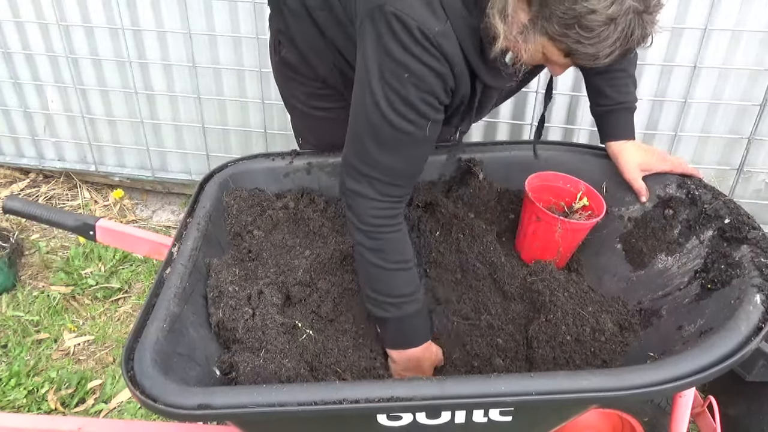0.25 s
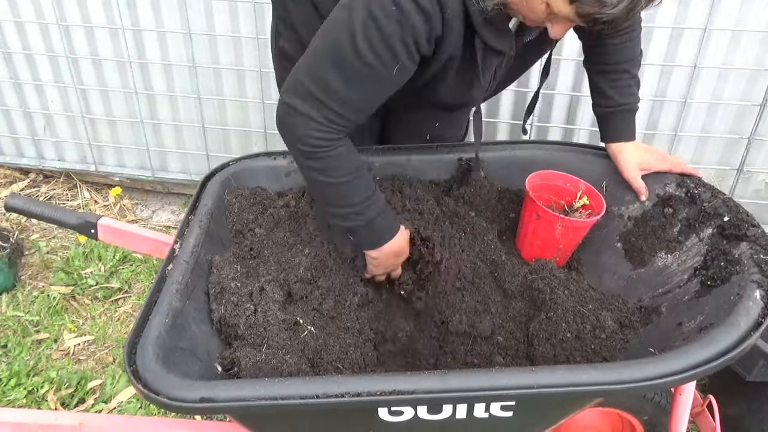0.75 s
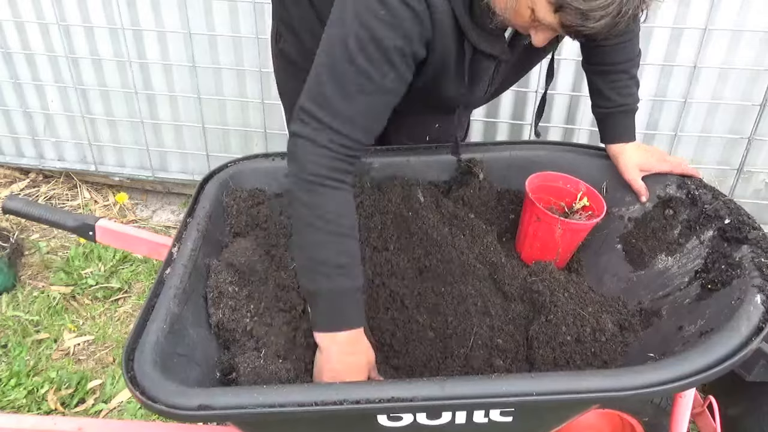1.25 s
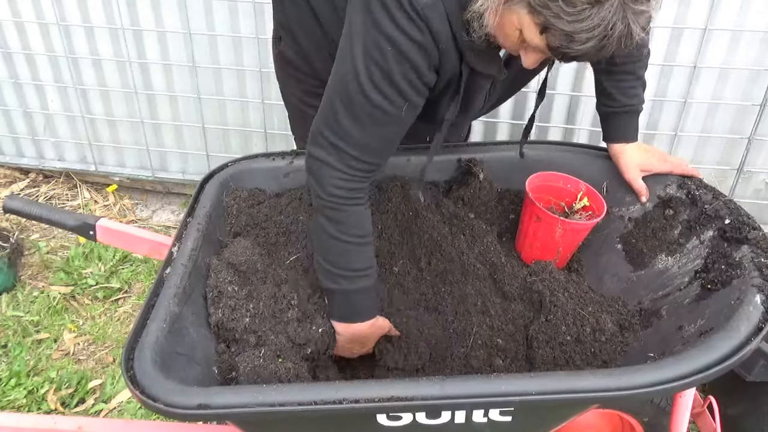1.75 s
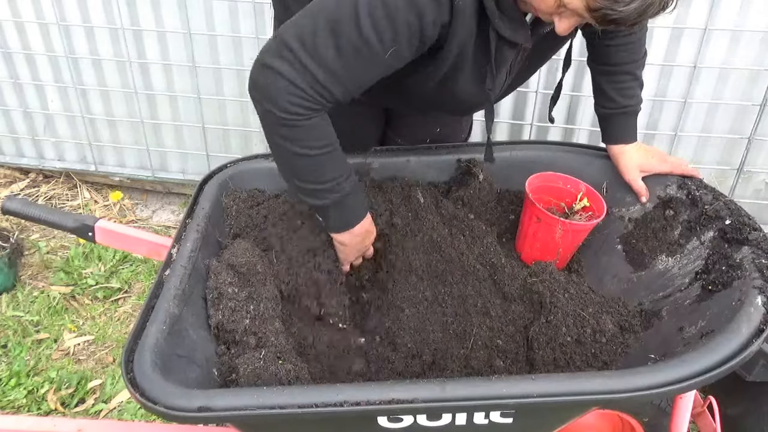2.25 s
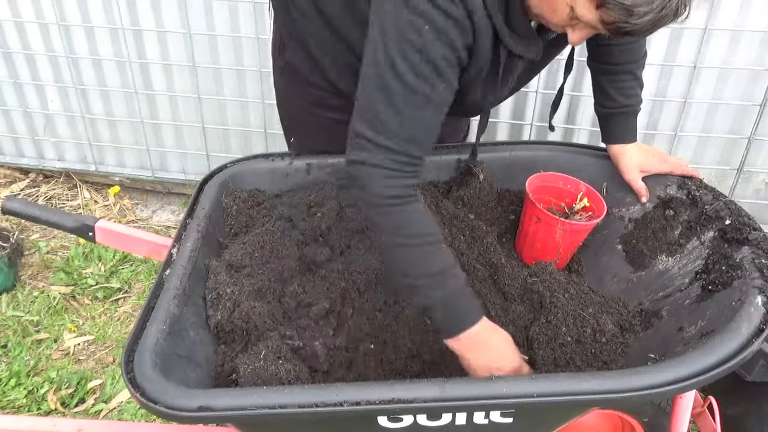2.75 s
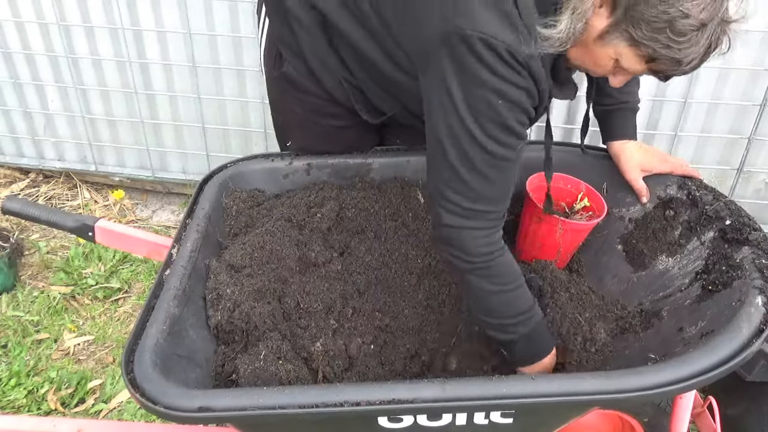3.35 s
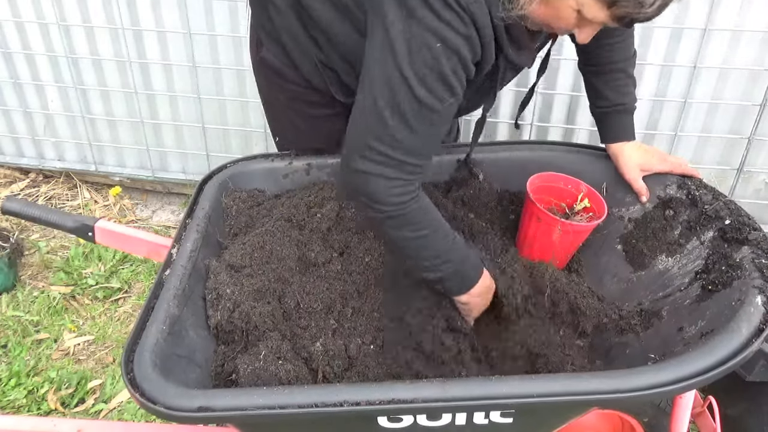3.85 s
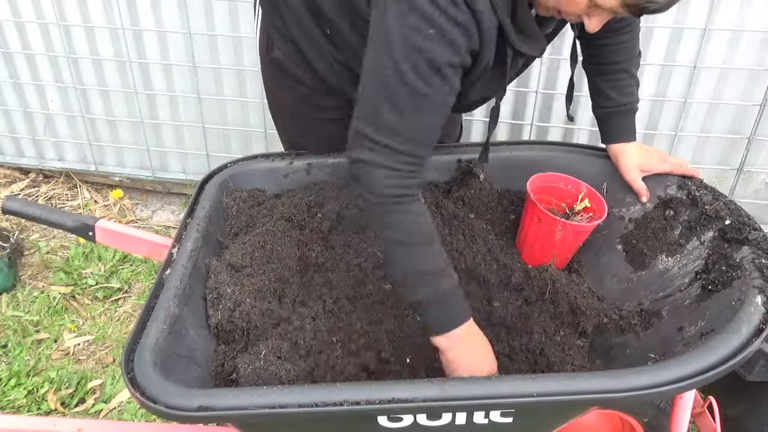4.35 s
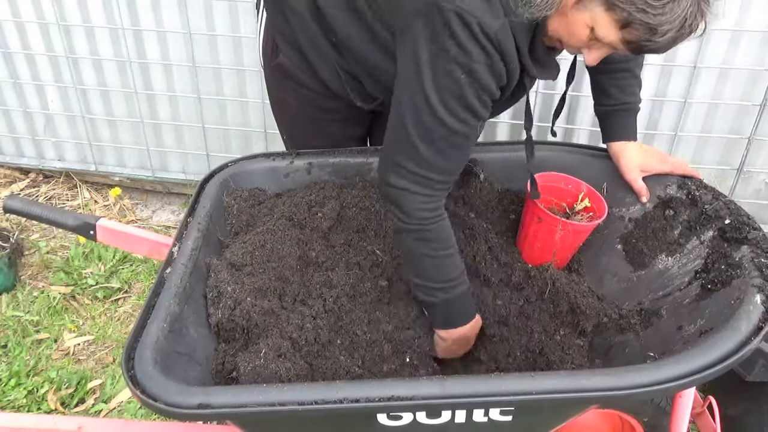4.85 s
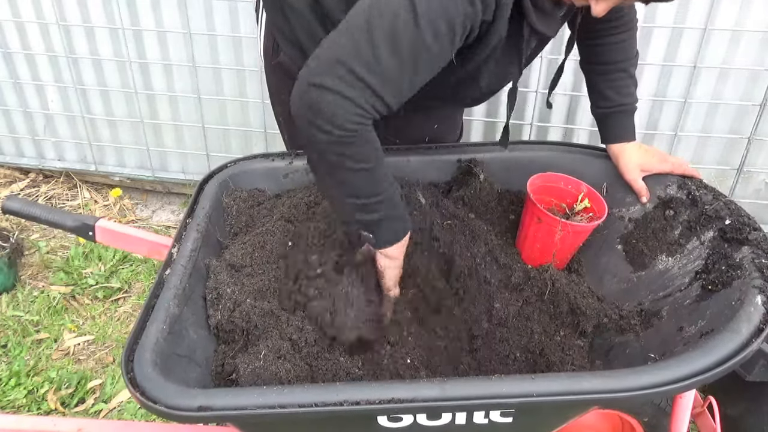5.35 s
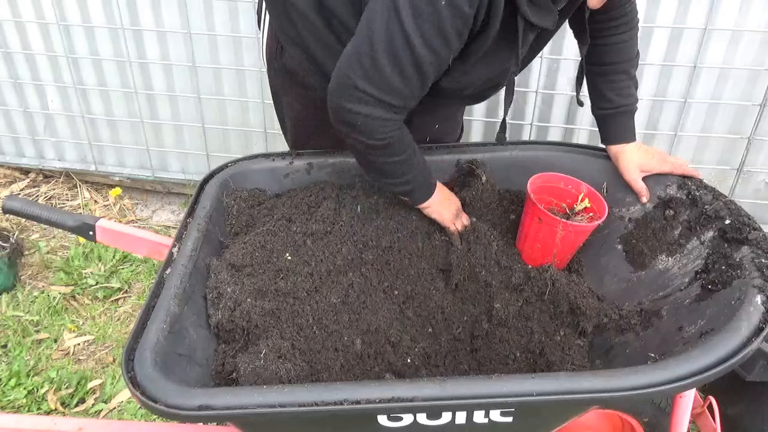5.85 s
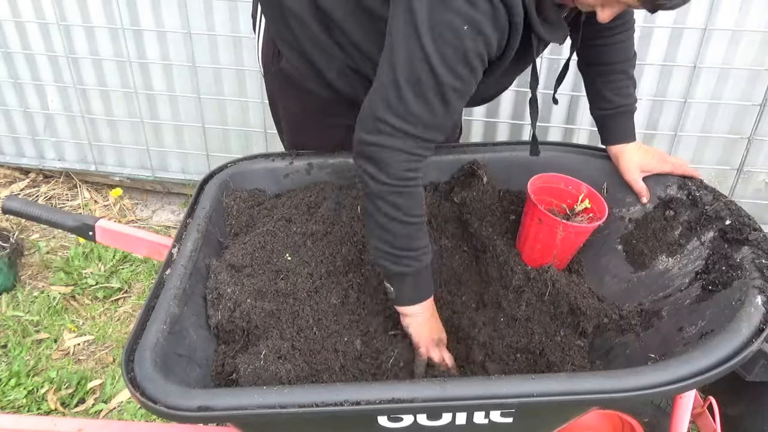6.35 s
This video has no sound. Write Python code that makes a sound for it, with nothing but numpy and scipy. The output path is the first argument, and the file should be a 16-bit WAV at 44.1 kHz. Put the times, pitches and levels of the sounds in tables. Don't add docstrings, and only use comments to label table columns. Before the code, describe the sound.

A bare hand digs through loose potting mix in a plastic tub, bark chips snapping sharply, while birds whistle in the garden behind.

```python
import sys
import numpy as np
from scipy import signal
from scipy.io import wavfile
from scipy.ndimage import map_coordinates

SR = 44100
rng = np.random.default_rng(int(sys.argv[2]) if len(sys.argv) > 2 else 0)


def ratio_of_db(decibels):
    return 10 ** (np.asarray(decibels, float) / 20)


def unload_audio(sound):
    columns = np.transpose(np.atleast_2d(sound))
    steps = np.round(np.clip(columns, -1, 1) * 32767)
    wavfile.write(sys.argv[1], SR, steps.astype(np.int16))


N = 291942

# (time [s], peak level [dB], thud over it
# [dB], crack over it [dB], chip pitch [Hz])
BREAKS = [(0.0425, -32, -10, -8, 1870), (0.078, -22, -8, -11.5, 2000), (0.0841, -25.5, -6, -15.5, 2880),
          (0.0954, -48, 3, -9, 1840), (1.0488, -24.5, -17, -27, 2650), (1.0557, -27.5, -13, -34, 2500),
          (1.3591, -24, -27, -11.5, 4600), (1.4308, -31, -11, -15, 2000), (1.6239, -33, -10.5, -19.5, 2200),
          (2.7685, -15, -23, -19, 2900), (2.7755, -29, -22, -14, 3300), (4.3645, -41, 1.5, -13, 2130),
          (4.3877, -55, 8, -2.5, 4330), (5.6168, -20.5, -16, -2, 2800), (5.6248, -39, -2, -4, 4580),
          (5.6324, -47, 0.5, -2.5, 1840), (5.6415, -37, -17, -2, 3470), (6.5416, -27, -16, -3, 2770),
          (6.5505, -41, -4, -3, 4500)]


def rms_one(x):
    return x / np.sqrt(np.mean(x ** 2) + 1e-20)


def in_time(rows):
    s, *columns = np.transpose(rows)
    return [np.interp(np.arange(N) / SR, s, column) for column in columns]


def at_hz(points, hz):
    points_hz, points_db = np.transpose(points)
    return np.interp(np.log(hz), np.log(points_hz), points_db)


def drift(rate_hz):
    r = np.exp(-2 * np.pi * rate_hz * 40 / SR)
    steps = rng.standard_normal(N // 40 + 2002)
    slow = signal.lfilter([1], [1, -2 * r, r * r], steps)[2000:]
    return np.interp(np.arange(N) / 40, np.arange(len(slow)), rms_one(slow))


def coloured(spectrum, patchy_db, flicker_hz, excite=1):
    # (frequency [Hz], side minus mid [dB])
    side_width = [(60, -15), (110, -13.5), (190, -12.5), (340, -10.5), (610, -12), (1090, -7.5),
                  (1960, -7.5), (3490, -8), (6240, -8), (11200, -28)]
    low_hz, high_hz = spectrum[0][0], spectrum[-1][0]
    edges = np.geomspace(low_hz, high_hz, int(2 * np.log2(high_hz / low_hz)) + 2)
    white = rng.standard_normal((2, 2, N)) * excite
    out, together = 0, drift(flicker_hz)
    for k, (low, high) in enumerate(zip(edges, edges[1:])):
        band = signal.butter(2, [low, high], "band", fs=SR, output="sos")
        mid, side = signal.sosfilt(band, white[k % 2])
        hz = np.sqrt(low * high)
        flicker_db = patchy_db * (0.63 * together + 1.33 * drift(flicker_hz))
        gain = ratio_of_db(at_hz(spectrum, hz) + flicker_db)
        out = out + gain * (mid + ratio_of_db(at_hz(side_width, hz)) * side * [[1], [-1]])
    return rms_one(out)


def swells(start_s, hold_s, level_db, rise_db_per_s, fall_db_per_s):
    t = np.arange(0, N + 32, 32) / SR
    start, end = start_s[:, None], (start_s + hold_s)[:, None]
    shape_db = -rise_db_per_s * np.maximum(start - t, 0) - fall_db_per_s * np.maximum(t - end, 0)
    power = np.sum(ratio_of_db(2 * (level_db[:, None] + shape_db)), axis=0)
    return np.interp(np.arange(N) / SR, t, power)


def garden_hiss():
    # (frequency [Hz], level per Hz [dB])
    air_spectrum = [(15, -43), (25, -1), (129, -17), (529, 6), (1030, 2), (1480, -14), (2060, -5.5),
                    (2880, 0.5), (4570, -9), (5610, -9), (6370, -4), (10600, -29), (11500, -31),
                    (15000, -55), (22000, -120)]
    return ratio_of_db(-60) * coloured(air_spectrum, patchy_db=1.7, flicker_hz=4.0)


def wind():
    # (start [s], hold [s], flutter level [dB], deep push over it [dB])
    gusts = [(0.0, .005, -53, -19), (0.09, .02, -49, -30), (0.2, 0.21, -61.5, -13), (0.55, .1, -70, 1.5),
             (0.7, .15, -65, 1.5), (0.81, .07, -66, 5), (0.89, 0.076, -61, 8.5), (0.985, .01, -53, -12),
             (1.46, .1, -66, -10), (1.6, .06, -64, -3), (1.79, .02, -66.5, -7), (3.077, .03, -58, -22),
             (4.42, 0.037, -65.5, -6), (5.17, .02, -52, -15), (5.22, .04, -54.5, -11), (5.3, .1, -56, -8),
             (5.44, .2, -56, -7), (5.67, .015, -58, -5), (5.75, .15, -63, -4), (5.95, .45, -68, -3),
             (3.45, .2, -67, -15), (1.1, .15, -74, 3), (6.552, .02, -54.5, -20)]
    # (frequency [Hz], level per Hz [dB])
    flutter_spectrum = [(88, -48), (150, 0), (303, -3.5), (345, -2.5), (520, -8.5), (680, -38),
                        (1140, -120)]
    push_spectrum = [(18, -54), (30, -16), (64, 3.5), (108, -0.5), (134, 2.5), (200, -4), (260, -25),
                     (440, -120)]
    breeze_db, breeze_push_db = -71, -79

    def gust_gain(level_db, calm_db):
        gust_power = swells(s, hold, level_db, rise_db_per_s=380, fall_db_per_s=260)
        return np.sqrt(ratio_of_db(2 * calm_db) + gust_power)

    s, hold, flutter_db, push_db = np.transpose(gusts)
    lumpy = gust_gain(flutter_db, breeze_db)
    deep = gust_gain(flutter_db + push_db, breeze_push_db)
    flutter = ratio_of_db(-2.0) * lumpy * coloured(flutter_spectrum, patchy_db=1.5, flicker_hz=13.5)
    mesh = signal.butter(4, 480.0, fs=SR, output="sos")
    flutter = signal.sosfilt(mesh, flutter)
    return flutter + ratio_of_db(-2.5) * deep * coloured(push_spectrum, patchy_db=0.0, flicker_hz=11.6)


def hand():
    # (time [s], effort [dB], depth in the heap [dB])
    stir = [(0.0, -56, -0.6), (0.2, -55.5, -0.6), (0.5, -58, -0.6), (1.4, -58.5, -1.2), (1.62, -58, 0.4),
            (1.82, -60.5, 0.6), (2.36, -62, -0.6), (2.95, -61, 0.6), (3.25, -57.5, 1.2), (4.06, -62.5, 1.2),
            (4.54, -61.5, 1.2), (4.8, -63.5, 2.2), (5.36, -64.5, 1.2), (5.73, -62, 0.6),
            (5.97, -64.5, -0.6), (6.47, -64, 1.5), (6.62, -62, 0.4)]
    # (start [s], hold [s], rubbing level [dB], grit over it [dB], lumps over it [dB])
    scoops = [(-0.02, .022, -47.5, 0.5, -3.5), (0.095, .04, -51, -3, 2.5), (0.69, .01, -59, -2.5, -2.5),
              (1.434, .016, -49, -2, -2), (1.462, .022, -44, -4, -3.5), (1.53, .105, -49.5, -1.5, -4),
              (1.80, .02, -57, -3.5, -6), (2.605, 0.043, -54, -3.5, -1), (2.985, .19, -52.5, 3.5, -2.5),
              (3.402, .03, -57, -8, -4.5), (4.322, 0.069, -57, -5, -4), (5.605, .065, -54, 0.4, -1),
              (5.804, .02, -60, 0.5, -6), (6.16, .03, -60.5, -4, -5), (6.525, .06, -56, 0.5, 0)]
    # (lumps [dB], rubbing [dB], grit [dB])
    shed_db = [-14.5, -23, -22]
    shed_after_s = 0.0055
    effort_db, depth_db = in_time(stir)
    stir_db = [effort_db + depth_db - 0.06, effort_db + depth_db / 2 + 2.5, effort_db + 0.15]
    s, hold, rub_db, grit_db, lump_db = np.transpose(scoops)
    at, chip_db, thud_db, crack_db, _ = np.transpose(BREAKS)
    layers = zip(stir_db, (lump_db, 0, grit_db), (thud_db, 0, crack_db), shed_db)
    gains = []
    for steady_db, scoop_db, part_db, crumbs_db in layers:
        scooped = swells(s, hold, rub_db + scoop_db, rise_db_per_s=400, fall_db_per_s=190)
        shed = swells(at + shed_after_s, 0, chip_db + part_db + crumbs_db, rise_db_per_s=3000, fall_db_per_s=650)
        gains.append(np.sqrt(ratio_of_db(2 * steady_db) + scooped + shed))
    return gains


def grains(per_s, spread_db, bed):
    born = rng.random(N) < per_s / SR
    sizes = ratio_of_db(spread_db * np.minimum(rng.exponential(1, N), 4.0))
    return bed + signal.lfilter([1], [1, -.96], born * sizes)


def soil():
    # (frequency [Hz], level per Hz [dB])
    crumble_spectrum = [(120, -46), (200, -14), (416, -4.5), (465, -1.5), (1500, -4), (1950, -37),
                        (3300, -120)]
    rub_spectrum = [(820, -40), (1400, -3), (1860, -2), (2620, -3.5), (4600, -6.5), (5980, -38),
                    (10100, -120)]
    grit_spectrum = [(2650, -28), (4500, 3), (10500, -4), (11300, -11), (11500, -29), (15000, -59),
                     (22000, -120)]
    lumps, fingers, fines = hand()
    bed = 5.4 * (np.median(fingers) / fingers) ** 0.4
    contacts = grains(per_s=220, spread_db=3.5, bed=bed) / (bed + 0.45)
    crumble = lumps * coloured(crumble_spectrum, patchy_db=1.0, flicker_hz=7.5, excite=contacts)
    rub = fingers * coloured(rub_spectrum, patchy_db=1.4, flicker_hz=21.5, excite=contacts)
    grit = fines * coloured(grit_spectrum, patchy_db=0.83, flicker_hz=41, excite=contacts)
    return crumble + rub + grit


def all_snaps():
    # (time [s], peak level [dB], crack over it [dB], chip pitch [Hz], left-right [dB])
    chips = [(0.6847, -35.5, -28, 1940, 3), (1.0332, -37, -23, 2390, 1.2), (1.1218, -46, -17, 2100, 0.4),
             (1.2245, -42, -11, 2430, 1.5), (1.277, -39, -25, 2100, 0.4), (1.2822, -37, -20.5, 2060, 0.4),
             (1.3144, -38, -4.5, 3680, 2.2), (1.3667, -43, -12, 2370, -2.2),
             (1.8256, -42.5, -16, 2300, -0.4), (2.6136, -34.5, -12, 3100, 5), (2.6404, -34.5, -12, 2230, 3),
             (4.3238, -42, -5, 4300, -0.4), (4.356, -47, -7, 1970, -1.5), (4.4364, -43, -9.5, 2060, -1.2),
             (5.6436, -41, 1, 4260, 5), (5.998, -47, -10, 4740, -0.4), (6.3973, -48, -7.5, 3060, 2.2),
             (6.4546, -40, -18, 3560, -4), (6.57, -38, -22, 3000, -1.2)]
    # (time [s], crack level [dB], left-right [dB])
    ticks = [
        (2.0144, -54, -9.5),
        (2.0994, -53, -3),
        (3.371, -52, 1.2),
        (4.3131, -39.5, 4),
        (4.35, -53, -12),
        (6.5002, -45, 6),
    ]
    # (time [s], peak level [dB], crack over it [dB], pitch [Hz])
    crumbs = [(1.4258, -35, -18, 2200), (1.434, -35, -16, 2200), (1.4405, -38, -20, 2000),
              (1.4485, -38, -20, 1700), (1.4556, -33, -22, 1200), (1.4612, -32, -22, 2200),
              (1.4665, -31, -20, 2400), (1.4708, -29, -20, 1700), (1.4775, -33, -18, 1300),
              (1.4848, -32, -20, 1300), (1.4895, -38, -14, 3500), (1.4958, -33, -22, 1300),
              (1.5045, -39, -20, 2500), (1.5175, -39, -18, 1700), (1.5905, -40, -16, 3500),
              (1.6045, -39, -18, 2800), (1.6305, -41, -12, 4500), (0.0865, -33, -8, 2200),
              (0.0895, -38, -12, 2600), (0.8726, -42, -20, 2090), (1.0285, -42, -24, 1500),
              (1.0408, -41, -18, 3800), (2.594, -42, -16, 1400), (2.661, -44, -20, 900),
              (2.7722, -30, -14, 2200), (2.9943, -42, -10, 4000), (3.1165, -44, -10, 4000),
              (5.6195, -33, -3, 3600), (5.6212, -35, -5, 2400), (5.6455, -45, 2, 4000),
              (6.5042, -46, -14, 3600), (6.5335, -44, -12, 3200), (6.5385, -43, -3, 2000),
              (6.5445, -38, 0, 4200), (6.575, -45, -16, 2800), (6.578, -45, -16, 2800),
              (6.5902, -41, -16, 3700)]
    # (time [s], peak level [dB], pitch [Hz])
    splits = [
        (2.7685, -15.5, 4500),
        (2.7684, -20, 6400),
        (2.7685, -19, 2000),
        (5.617, -25, 5300),
        (5.6168, -14, 9500),
        (6.5417, -26, 9300),
    ]
    break_pan_db, chip_thud_db = 1.3, -16.5
    rest_db = -32
    return ([(s, db, db + thud, db + crack, hz, break_pan_db) for s, db, thud, crack, hz in BREAKS]
            + [(s, db, db + chip_thud_db, db + crack, hz, pan) for s, db, crack, hz, pan in chips]
            + [(s, db - 7, db - 9.5, db, 1900, pan) for s, db, pan in ticks]
            + [(s, db, db + chip_thud_db, db + crack, hz, 0.4) for s, db, crack, hz in crumbs]
            + [(s, db, db + rest_db, db + rest_db, hz, break_pan_db) for s, db, hz in splits])


def resonate(x, modes):
    out = 0
    for k, (hz, width_hz, level_db) in enumerate(modes):
        r = np.exp(-np.pi * width_hz / SR)
        poles = [1, -2 * r * np.cos(2 * np.pi * hz / SR), r * r]
        zeros = [(1 - r * r) / 2, 0, (r * r - 1) / 2]
        out = out + (-1) ** k * ratio_of_db(level_db) * signal.lfilter(zeros, poles, x + 1e-18)
    return out


def thrown_back(snapped):
    t = np.arange(SR // 10) / SR
    decay = ratio_of_db(-60 * t / 0.033) * (t > .0008)
    mid, side = rng.standard_normal((2, len(t))) * decay
    scatter = np.array([mid + 0.55 * side, mid - 0.12 * side])
    scatter = signal.lfilter([.7], [1, -.3], scatter / np.sqrt(np.sum(mid ** 2)))
    return ratio_of_db(-10.5) * signal.fftconvolve(snapped, scatter, axes=1)[:, :N]


def snaps():
    # (pitch ratio, width ratio, level [dB])
    chip_modes = [(0.998, 0.79, 17.5), (1.75, 1.75, 8)]
    # (frequency [Hz], width [Hz], level [dB])
    tub_modes = [(696, 330, 1.5), (1242, 780, 0.5)]
    crack_modes = [(5700, 1770, -4), (7380, 2050, -1.5), (10000, 6500, -3.5)]
    events = all_snaps()
    t = np.arange(1500) / SR
    bursts = rng.standard_normal((len(events), 3, len(t)))
    lasting_s = np.array([[.012], [.025], [.007]])
    splintering = ratio_of_db(-60 * t / lasting_s) * np.minimum(t / 0.00051, 1)
    pulse = np.arange(len(t)) == 30
    snapped = np.zeros((2, N + len(t)))
    for (s, chip_db, thud_db, crack_db, chip_hz, pan_db), burst in zip(events, bursts):
        force = 0.1 * burst * splintering + pulse
        chip = [(chip_hz * ratio, chip_hz * width, db) for ratio, width, db in chip_modes]
        tilt_db = 0.22 * (crack_db - chip_db + 4.0)
        crack = [(hz, width, db + k * tilt_db / 2) for k, (hz, width, db) in enumerate(crack_modes)]
        bodies = [resonate(resonate(f, m), m) for f, m in zip(force, (chip, tub_modes, crack))]
        levels = ratio_of_db([chip_db + 0.23, thud_db + 2.5, crack_db + 11.5])
        snap = sum(level * body / np.abs(body).max() for level, body in zip(levels, bodies))
        i = round(s * SR)
        snapped[:, i:i + len(t)] += snap * ratio_of_db([[pan_db / 2], [-pan_db / 2]])
    snapped = snapped[:, :N]
    return snapped + thrown_back(snapped)


def bumps():
    # (time [s], frequency [Hz], level [dB])
    knocks = [
        (5.165, 200, -44),
        (5.17, 290, -46),
        (5.215, 290, -49),
        (5.39, 180, -48),
        (5.667, 165, -43),
        (0.088, 370, -42),
        (4.42, 150, -56),
        (6.55, 160, -47),
    ]
    out, t = np.zeros(N + SR), np.arange(SR // 5) / SR
    for s, hz, level_db in knocks:
        i = round(s * SR)
        swell = ratio_of_db(level_db - 60 * t / 0.11) * np.minimum(t / .008, 1)
        out[i:i + len(t)] += swell * np.sin(2 * np.pi * hz * t)
    return out[:N]


def glide(row, kind):
    start, length, first_hz, last_hz, level_db = row
    onset, arch, hook, top, before_db, after_db = kind
    settle_s = 0.01196
    u = np.linspace(0, 1, num=round(length * 500) + 2)
    bend = onset * np.exp(-u * length / settle_s)
    bend = bend + arch * (1 - np.abs(2 * u - 1) ** 2.8)
    bend = bend + hook * np.exp((u - 1) * length / settle_s)
    hz = (first_hz + (last_hz - first_hz) * u) * (1 + bend)
    swell_db = np.interp(u, [0, np.clip(top, .02, .98), 1], [before_db, 0, after_db])
    return np.transpose([start + u * length, hz, level_db + swell_db])


def note(rows, fade_s):
    s, hz, level_db = np.transpose(rows)
    t = np.arange(s[0], s[-1], 1 / SR)
    fade = np.clip(np.minimum(t - s[0], s[-1] - t) / fade_s, 0, 1)
    gain = ratio_of_db(np.interp(t, s, level_db)) * fade
    phase = 2 * np.pi * np.cumsum(np.interp(t, s, hz)) / SR
    i = round(s[0] * SR)
    return slice(i, i + len(t)), phase, gain


def swipes():
    # (start [s], length [s], first centre [Hz], last centre [Hz], level [dB])
    strokes = [(3.525, .08, 2800, 3900, -50.5), (3.535, .1, 4150, 4350, -49.5),
               (3.54, .07, 5000, 5000, -53.5), (6.098, .045, 2300, 3100, -60),
               (6.115, .085, 3000, 4100, -54.5), (6.165, .07, 3600, 3450, -59.5),
               (3.04, .065, 1420, 1300, -48.5), (3.09, .05, 1300, 1350, -48.5),
               (2.995, .05, 1300, 1300, -55), (1.435, .075, 1600, 1100, -47), (1.455, .03, 1900, 2300, -45)]
    out = np.zeros(N)
    for row in strokes:
        rows = glide(row, (0, .04, 0, 0.6, -10, -12))
        span, phase, gain = note(rows, fade_s=0.018)
        share = .28 * ratio_of_db(.7 * (row[-1] + 50))
        steps = rng.standard_normal((2, 600))
        a, b = [map_coordinates(v, [share * phase / (2 * np.pi)], order=3) for v in steps]
        out[span] += gain * (a * np.cos(phase) + b * np.sin(phase))
    return out


def birds(notes, flutter_db, echo_db, pan_db):
    whistle = np.zeros(N)
    for rows in notes:
        span, phase, gain = note(rows, fade_s=0.004)
        whistle[span] += np.sqrt(2) * gain * np.sin(phase)
    whistle = whistle * ratio_of_db(flutter_db * drift(38))
    t = np.arange(SR // 2) / SR
    decay = ratio_of_db(-60 * t / 1.0) * (t > .015)
    garden = rng.standard_normal((2, len(t))) * decay / np.sqrt(0.025 * SR)
    wet = signal.fftconvolve(whistle[None], garden, axes=1)[:, :N]
    far_wall = ratio_of_db(-15 + 3.0 * drift(15)) * np.roll(whistle, round(.16 * SR))
    direct = whistle + far_wall
    return direct * ratio_of_db([[pan_db / 2], [-pan_db / 2]]) + ratio_of_db(echo_db) * wet


def birdsong():
    # (onset bend [share], arch [share], end bend [share], loudest at [share],
    # level before [dB], level after [dB])
    plain = (0, 0, 0, 0.56, -4.5, -6)
    drop = (0.23, 0, 0, 0.1, -12, -11.5)
    lift = (-.1, 0, 0, .65, -12, -10)
    arched = (0, .15, 0, 0.4, -16, -17)
    hooked = (0, 0, -0.15, 0.5, -6.5, -7)
    far_arched = (0, .012, 0, .5, -2, -2)
    # (start
    # [s], length [s], first pitch [Hz], last pitch [Hz], level [dB])
    song_plain = [
        (2.432, 0.081, 2230, 2176, -46.5),
        (3.145, .05, 2075, 1995, -40.5),
        (3.27, .085, 1700, 1538, -51),
    ]
    song_drop = [(2.645, .26, 2010, 1795, -42)]
    song_lift = [(3.015, .125, 2340, 2087, -38)]
    song_arched = [(1.955, .32, 1630, 1660, -50)]
    song_hooked = [(2.575, .085, 3097, 3095, -48)]
    far_plain = [(1.78, 0.055, 2110, 1630, -59.5), (1.815, 0.028, 2350, 2250, -56),
                 (2.31, 0.049, 1890, 1847, -56.5), (2.93, .09, 1900, 1847, -55.5),
                 (2.66, .08, 3090, 3080, -62), (3.0, .055, 3080, 3400, -51),
                 (3.68, .16, 2170, 2045, -66), (4.05, .045, 2140, 2200, -55.5),
                 (4.12, .05, 2170, 2200, -55), (4.37, 0.11, 4330, 4400, -64),
                 (4.40, .07, 4800, 5000, -62), (4.43, .09, 2070, 2040, -61),
                 (4.525, .05, 2050, 2080, -63), (4.59, .1, 2080, 2170, -64),
                 (2.5, .055, 2500, 2620, -61), (2.525, .028, 3500, 3550, -59),
                 (3.262, .026, 2180, 2200, -50), (3.305, .045, 2100, 2050, -55),
                 (3.2, .028, 2250, 2200, -53), (3.36, .045, 1620, 1560, -59),
                 (3.125, .03, 2150, 2100, -50), (5.22, .1, 4320, 4280, -70),
                 (5.38, .13, 4280, 4300, -70), (4.575, .06, 4620, 4580, -63.5),
                 (4.55, .1, 3970, 3960, -65), (4.585, .04, 2700, 2680, -59.5),
                 (4.64, .04, 2640, 2680, -60)]
    replies_arched = [
        (4.95, .1, 4800, 5060, -66),
        (5.046, .115, 5060, 4710, -65.5),
        (5.157, .055, 4710, 4230, -65),
    ]
    step_s = .0108
    trill = [(2.384 + k * step_s, .85 * step_s, 1750, 2380, -55) for k in range(5)]
    near = ((song_plain, plain), (song_drop, drop), (song_lift, lift),
            (song_arched, arched), (song_hooked, hooked))
    far = ((far_plain, plain), (trill, plain), (replies_arched, far_arched))
    near, far = [[glide(row, kind) for rows, kind in bird for row in rows] for bird in (near, far)]
    nearer = birds(near, flutter_db=2.0, echo_db=-13.0, pan_db=-1.0)
    return nearer + birds(far, flutter_db=2.6, echo_db=-8.5, pan_db=-3.5)


def scene():
    return garden_hiss() + wind() + soil() + snaps() + bumps() + swipes() + birdsong()


def band_limit(x):
    return signal.sosfilt(signal.butter(12, 11760, fs=SR, output="sos"), x)


def record(dry):
    mid, side = (dry[0] + dry[1]) / 2, (dry[0] - dry[1]) / 2
    side = signal.sosfilt(signal.butter(3, 7600.0, fs=SR, output="sos"), side)
    top_cut = signal.cheby2(11, 19.0, 11344 * 0.995, fs=SR, output="sos")
    mix = signal.sosfiltfilt(top_cut, [mid + side, mid - side])
    return band_limit(mix)


dry = scene()
out = record(dry)
unload_audio(out)
```